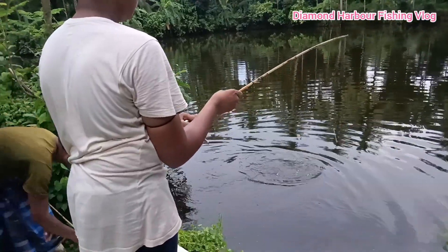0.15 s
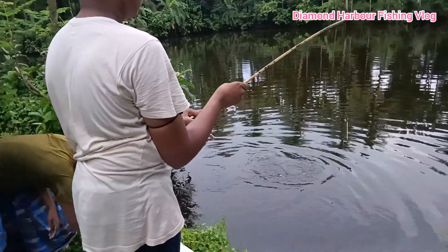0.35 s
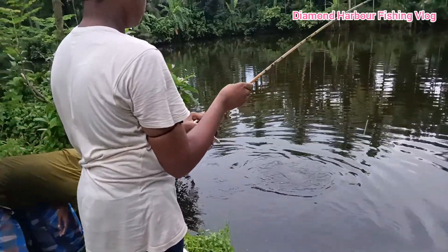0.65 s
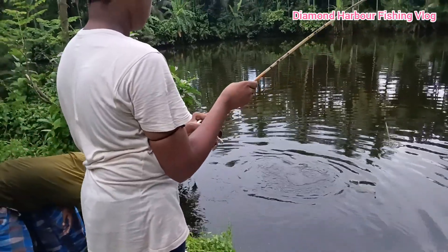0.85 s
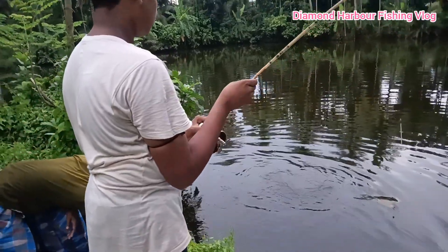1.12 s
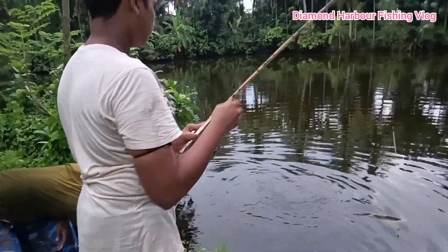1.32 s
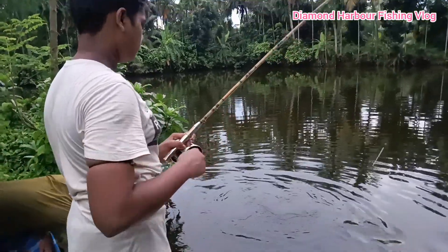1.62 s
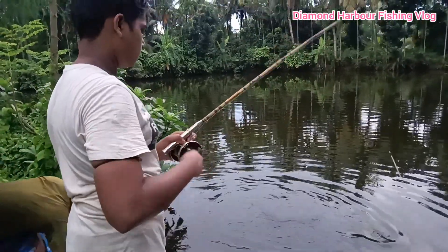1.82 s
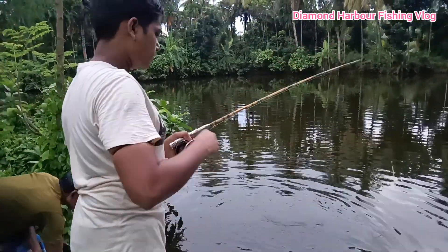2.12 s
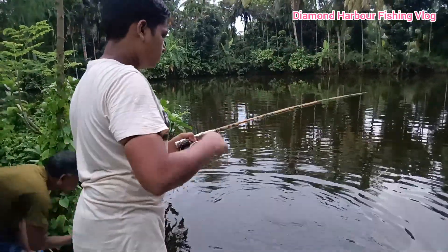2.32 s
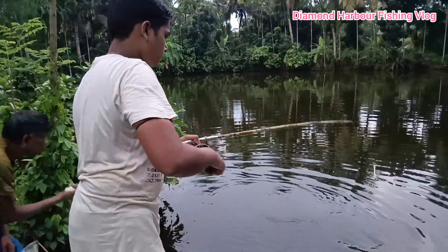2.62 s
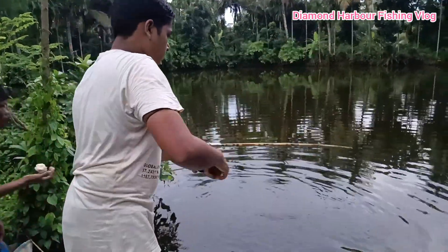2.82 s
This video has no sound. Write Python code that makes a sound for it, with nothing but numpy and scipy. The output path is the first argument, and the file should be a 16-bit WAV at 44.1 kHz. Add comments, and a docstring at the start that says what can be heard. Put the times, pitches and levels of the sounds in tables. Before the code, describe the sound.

A fishing reel, close and bright, dominates the second half. From 0 to 1.5 seconds there is only quiet pondside air, faint wavering bird whistles, soft rustling, tiny twig snaps and thin insects. At 1.5 seconds one metallic tick, two more near 1.62, then from 1.7 to the end a fast ratchet buzz of ringing clicks, surging and slackening several times a second, its tone shifting between fuller and thinner.

```python
"""A fishing reel ticks three times close by, then buzzes unevenly, while birds whistle far off by a pond.
The reel is a train of short ringing clicks, one per ratchet tooth, spaced by the changing spool speed.
Birds are wavering sine tones smeared by echoes; rustle and chatter are puffs of narrow noise.
Underneath lie shaped noise for air, insects, leaves and low thudding, plus faint blips and twig snaps."""
import sys
import numpy as np
from scipy import signal
from scipy.fft import rfft, irfft
from scipy.io import wavfile
from scipy.ndimage import uniform_filter1d

SR = 44100
rng = np.random.default_rng(int(sys.argv[2]) if len(sys.argv) > 2 else 0)


def decibels_to_gain(level_db):
    """Convert a level in decibels to a linear amplitude gain (20 dB per decade)."""
    exponent = np.asarray(level_db, float) / 20
    return 10 ** exponent


def int16_out(signal):
    """Quantize to a 16-bit WAV file."""
    q = np.round(np.clip(np.atleast_2d(signal).T, -1, 1) * 32767)
    wavfile.write(sys.argv[1], SR, q.astype(np.int16))


N = 130095  # length in samples
TIME_S = np.arange(N) / SR
FAR_TOP_HZ = 7500  # distance dulls sounds above this

# lone ratchet ticks as the handle takes up: (time [s], level [dB])
TICKS = [(1.52, -17.5), (1.6131, -16), (1.635, -14.5)]


def column(table, k, t):
    """Read column k of a curve at times t, with straight lines between its points."""
    table = np.array(table, float)
    return np.interp(t, table[:, 0], table[:, k])


def level(x, db):
    """Scale a sound to an rms level in dB."""
    return x * decibels_to_gain(db) / np.sqrt(np.mean(x ** 2))


def walk(rate_hz):
    """Random wandering with an rms of 1: noise smoothed twice, faster for a higher rate."""
    k = max(int(SR / rate_hz), 2)
    smooth = uniform_filter1d(rng.standard_normal(N), size=k)
    return level(uniform_filter1d(smooth, size=k), 0)


def band(x, hz, width_hz):
    """Keep a narrow band of sound by applying the same resonance twice."""
    b, a = signal.iirpeak(hz, hz / width_hz, SR)
    once = signal.lfilter(b, a, x)
    return signal.lfilter(b, a, once)


def dull(x):
    """Take off the treble that distance swallows, with a low-pass filter."""
    return signal.sosfilt(signal.butter(4, FAR_TOP_HZ, fs=SR, output="sos"), x)


def echoes(x, t60, start_ms):
    """Dense echoes of unit energy: noise that fades by 60 dB in t60 seconds."""
    t = np.arange(SR) / SR
    fade_in = np.clip(t * 1000 / start_ms - .5, 0, 1)
    h = rng.standard_normal(SR) * 1000. ** (-t / t60) * fade_in
    return signal.fftconvolve(x, h / np.sqrt(np.sum(h ** 2)))[:N]


def clicks(times, db, rings, detune, scatter_db, drift_db):
    """Each click swells and dies within a few ms; its rings line up at their crests, varying in pitch and level."""
    # how far each click's ringing is stretched: (time [s], stretch [factor])
    ring_stretch = [(1.7, 1.05), (1.95, 1.1), (2.2, 1.3), (2.95, 1.4)]
    out, n = np.zeros(N + 600), np.arange(512)
    first = np.ceil(times * SR).astype(int)
    places = first[:, None] + n
    ms = (places - times[:, None] * SR) * 1000 / SR  # time since each click began
    stretch = column(ring_stretch, 1, times)[:, None]
    for hz, ring_db, crest_ms in rings:
        scatter, off_pitch, drift = rng.standard_normal((3, len(times)))
        drift = uniform_filter1d(drift, size=16) * 4  # wanders slowly from click to click
        gain = decibels_to_gain(db + ring_db + scatter_db * scatter + drift_db * drift)[:, None]
        pitch = hz * (1 + detune * off_pitch[:, None])
        u = ms / (crest_ms * stretch)  # 1 at the crest
        swell = (u * np.exp(1 - u)) ** 5
        from_crest_ms = ms * (1 - 1 / np.maximum(u, 1e-6))
        wave = gain * swell * np.cos(2 * np.pi * pitch * from_crest_ms / 1000)
        out += np.bincount(places.ravel(), wave.ravel(), N + 600)[:N + 600]
    return out[:N]


def reel():
    """The pawl drops once per ratchet tooth and bounces; five groups of rings follow their own levels."""
    # spool speed: (time [s], ratchet clicks [per s])
    spool = [(1.7074, 152), (1.74, 180), (1.788, 270), (1.838, 146), (1.875, 265), (1.9, 290), (1.945, 182),
             (1.965, 178), (2.0, 250), (2.035, 320), (2.075, 232), (2.11, 268), (2.15, 290), (2.2, 248),
             (2.215, 262), (2.243, 375), (2.272, 250), (2.295, 232), (2.35, 300), (2.4, 260), (2.447, 345),
             (2.505, 205), (2.565, 345), (2.6, 262), (2.64, 350), (2.66, 380), (2.678, 220), (2.702, 205),
             (2.765, 335), (2.81, 262), (2.85, 320), (2.885, 225), (2.95, 330)]
    # average buzz levels, before the random changes: (time [s], main rings [dB],
    # then against the main rings: upper rings [dB], treble [dB], top [dB], low knock [dB])
    buzz = [(1.708, -12.5, -25, -21.5, -32, -31), (1.718, -16, -16, -19, -28, -20.5),
            (1.77, -17, -12.5, -11, -24, -15), (1.808, -11.5, -17.5, -13.5, -27, -22.5),
            (1.832, -18.5, -19, -9.5, -20, -25), (1.884, -15, -13, -10, -24, -24.5),
            (1.928, -20, -5, -6.5, -24, -18), (1.984, -14.5, -17, -12.5, -26, -30.5),
            (1.994, -22, -7, -3.5, -18, -22), (2.056, -17.5, -13, -9, -21.5, -23.5),
            (2.126, -17.5, -2, -8, -23, -20.5), (2.164, -21.5, -4.5, -4, -24, -20),
            (2.174, -13, -14, -13, -28, -30), (2.222, -20, -5.5, -7, -20, -18),
            (2.246, -12, -11, -10.5, -25, -28.5), (2.27, -19, -9.5, -11.5, -23, -18),
            (2.32, -19.5, -0.5, -8, -25, -25.5), (2.364, -22.5, -1.5, -8.5, -32, -19.5),
            (2.392, -15, -13, -14, -32, -20), (2.416, -21, -5.5, -9.5, -26, -15.5),
            (2.448, -14.5, -6, -17.5, -29, -31), (2.462, -20.5, -8, -14.5, -31, -16.5),
            (2.524, -21.5, 2, -10, -25, -20.5), (2.554, -14.5, -7.5, -19, -33, -28),
            (2.616, -26, -1, -9.5, -21, -17.5), (2.642, -15.5, -7, -18.5, -28.5, -24),
            (2.676, -19.5, -12.5, -18, -30, -16.5), (2.69, -25, 0.5, -9.5, -21, -12.5),
            (2.752, -17.5, -1.5, -15.5, -29, -25), (2.794, -24, -3.5, -11, -23, -21),
            (2.866, -20.5, -10, -19.5, -26, -23), (2.885, -27, -5, -16.5, -26, -11.5),
            (2.95, -21, -2.5, -16, -21, -20)]
    # what the reel rings with, one list per group in the order of buzz:
    # (pitch [Hz], level [dB], time to the crest before stretching [ms])
    ring_groups = [
        [(2098, -2, 2.2), (2255, -1, 2.2), (2394, -5, 2.2)],
        [(2820, -7, 1.495), (3267, -5, 1.5), (3606, 0, 1.6)],
        [(4550, 4.5, 0.5), (5130, -0.5, 0.6), (6130, -6, 1), (6440, -3, 0.97), (7430, -3, 0.96),
         (8290, -7, 0.56), (9370, -19.5, 0.91)],
        [(11300, -2.5, 0.36), (13000, -22, 1), (12660, -7, 1), (15100, 0.5, 0.65)],
        [(965, -12.5, 2.21), (1270, 0, 2.03), (1645, 6.5, 2.7)],
    ]
    # the rest hold one value per group; click peak over the average level [dB]
    buzz_peak_db = [0, 5, 1, 4.5, 0]
    # each group's share of a lone tick [dB]
    tick_layers_db = [-9, -16.5, -21.5, -25.5, -40]
    # the pawl's second, weaker bounce, against the first drop [dB]
    rattle_db = [-22, -13, -3, -4, -22]
    # click-to-click spread of level [dB]
    ring_scatter_db = [1.2, 1.5, 2.5, 3, 1]
    # click-to-click spread of pitch [share of the pitch]
    ring_detune = [.005, .01, .02, .04, .006]
    # slow wander of each ring's strength [dB]
    ring_drift_db = [.8, 1.5, 3, 2.5, 3.5]
    # what bodies and bank throw back of each click [dB]
    tail_db = [-15, -10, -2, -3, -12]
    rattle_ms, click_jitter_ms, click_scatter_db = 2.5, .06, 1.0
    tail_t60_s, tail_start_ms, low_cut_hz = 0.059, 1.3, 780

    t = np.arange(int(spool[0][0] * SR), N) / SR
    teeth = np.cumsum(column(spool, 1, t)) / SR  # teeth passed so far
    drops = np.interp(np.arange(int(teeth[-1])), teeth, t)
    jitter, scatter = rng.standard_normal((2, len(drops)))
    drops = np.clip(drops + click_jitter_ms / 1000 * jitter, 0, t[-1])
    ticks = np.array(TICKS)
    times = np.r_[ticks[:, 0], drops]
    delay_s = rattle_ms / 1000 * np.exp(.3 * rng.standard_normal(len(times)))
    bounces = np.clip(times + delay_s, 0, t[-1])
    # sparser clicks are louder, so that the average level follows the table
    shared_db = column(buzz, 1, drops) + click_scatter_db * scatter
    shared_db = shared_db + 10 * np.log10(250 / column(spool, 1, drops))
    out = 0
    for k, rings in enumerate(ring_groups):
        buzz_db = shared_db + buzz_peak_db[k]
        if k:
            buzz_db = buzz_db + column(buzz, k + 1, drops)
        db = np.r_[ticks[:, 1] + tick_layers_db[k], buzz_db]
        direct = clicks(np.r_[times, bounces], np.r_[db, db + rattle_db[k]], rings,
                        ring_detune[k], ring_scatter_db[k], ring_drift_db[k])
        out = out + direct + decibels_to_gain(tail_db[k]) * echoes(direct, tail_t60_s, tail_start_ms)
    return signal.sosfilt(signal.butter(6, low_cut_hz, "high", fs=SR, output="sos"), out)


def shiver():
    """The frame shivers after each lone tick: bands of noise that die away."""
    # (centre [Hz], width [Hz], level against the tick [dB])
    shiver_bands = [(2096, 360, -17), (3500, 510, -22), (6060, 2400, -28.5)]
    t60_s = 0.11
    fade = 0
    for s, db in TICKS:
        started = TIME_S > s + .004
        fade = fade + decibels_to_gain(db) * started * 1000. ** (-np.abs(TIME_S - s) / t60_s)
    return fade * sum(level(band(rng.standard_normal(N), hz, w), db) for hz, w, db in shiver_bands)


def birds():
    """Whistles are sine tones gliding between two pitches; they waver, flutter and are smeared by the wood."""
    # notes: (start [s], length [s], first pitch [Hz], last pitch [Hz], level before flutter [dB],
    # pitch waver [Hz])
    notes = [(0., 0.11, 1888, 1867, -50, 11), (0., 0.11, 1314, 1330, -54.5, 9.8),
             (.185, 0.056, 1308, 1270, -56.5, 15), (0.38, 0.22, 1310, 1300, -62, 18),
             (.015, 0.031, 2305, 2450, -42, 19), (.075, 0.11, 2431, 2380, -45, 9.2),
             (0.145, 0.039, 1990, 2010, -48, 12), (0.159, 0.1, 2335, 2150, -46, 40),
             (.2, 0.096, 2248, 2344, -54, 14), (0.25, 0.06, 2357, 2400, -48, 16),
             (.36, 0.05, 2393, 2452, -46, 8.3), (.415, 0.07, 2501, 2505, -45, 13),
             (0.499, 0.054, 2450, 1486, -45.5, 100), (0.545, 0.054, 1457, 2170, -49.5, 98),
             (.49, 0.139, 2540, 2510, -46, 9.3), (.59, 0.071, 2292, 2067, -44.5, 75),
             (.64, 0.087, 2219, 2198, -42.5, 11), (0.733, 0.055, 2124, 2084, -47, 13),
             (.8, 0.088, 2183, 2184, -51, 33), (.92, 0.092, 2230, 2264, -54.5, 28),
             (.66, 0.14, 2383, 2475, -53.5, 15), (0.669, 0.058, 600, 599, -55, 7.8),
             (1.096, 0.135, 1340, 1420, -55, 16), (.95, 0.063, 1235, 1305, -61, 12),
             (.81, 0.099, 629, 505, -65, 6.8), (1.65, 0.57, 761, 787.3, -55.5, 33)]
    flutter_hz, flutter_db, waver_rate_hz = 70, 3.0, 500
    wood_t60_s, wood_db, wood_start_ms = .55, -2.5, 14.0
    out = np.zeros(N)
    flutter = decibels_to_gain(flutter_db * walk(flutter_hz))
    wobble = walk(waver_rate_hz)
    for start, length, from_hz, to_hz, db, waver_hz in notes:
        u = np.linspace(0, 1, int(length * SR))  # progress through the note
        i = int(start * SR)
        hz = from_hz + (to_hz - from_hz) * u + waver_hz * wobble[i:i + len(u)]
        swell = np.minimum(1, 9 * np.minimum(u, 1 - u))
        out[i:i + len(u)] += decibels_to_gain(db) * swell * np.sin(2 * np.pi * np.cumsum(hz) / SR)
    out = out * flutter
    return out + decibels_to_gain(wood_db) * echoes(out, wood_t60_s, wood_start_ms)


def puffs():
    """Rustle and blurred far chatter: narrow noise that swells and sinks in soft humps."""
    # (start [s], length [s], centre [Hz], width [Hz], level before the hump [dB])
    swells = [(0.506, 0.096, 4370, 500, -71), (.6, 0.2, 3460, 400, -66), (0.665, 0.094, 4760, 900, -62),
              (0.815, 0.13, 3500, 600, -62.5), (0.848, 0.21, 2440, 600, -56.5),
              (1.41, 0.051, 4900, 500, -66), (1.641, 0.071, 5190, 716, -49), (1.25, 0.077, 3000, 600, -67),
              (0., 0.77, 2180, 426, -55), (0.48, 0.55, 1830, 674, -56.5), (0.682, 0.89, 2100, 525, -63.5)]
    out = 0
    for start, length, hz, width, db in swells:
        hump = np.sin(np.pi * np.clip((TIME_S - start) / length, 0, 1)) * decibels_to_gain(0.72 * walk(66))
        out = out + hump * level(band(rng.standard_normal(N), hz, width), db)
    return out


def snaps():
    """Small twig snaps: single impulses sent through a broad resonance."""
    # (time [s], impulse level before the resonance and a gain of 3 [dB])
    twigs = [(.44, -30), (0.562, -30), (1.275, -37)]
    out = np.zeros(N)
    for s, db in twigs:
        out[int(s * SR)] = decibels_to_gain(db)
    return 3 * band(out, 2300, 2500)


def leaves():
    """Rustling leaves: a broad band of uneven noise that follows a level curve."""
    # (time [s], level [dB])
    rustle = [(0, -62.5), (.33, -71.5), (.55, -61), (1.0, -67), (1.1, -73), (1.5, -69)]
    noise = rng.standard_normal(N) * decibels_to_gain(2.0 * walk(130))
    noise = level(band(noise, 2860, 3000), 0)
    return dull(noise) * decibels_to_gain(column(rustle, 1, TIME_S))


def insects():
    """Insects: narrow bands of noise whose strength wavers quickly."""
    # (centre [Hz], width [Hz], level [dB])
    singers = [(6740, 690, -73), (7610, 160, -76.5), (9260, 57, -78), (9340, 110, -82)]
    out = 0
    for hz, width, db in singers:
        out = out + level(band(rng.standard_normal(N), hz, width) * decibels_to_gain(2.5 * walk(17)), db)
    return out


def blips():
    """Faint low sine blips come and go at random times and pitches."""
    low_hz, high_hz, length_s, softest_db = 350, 1400, .05, -73
    out = np.zeros(N)
    for when, pitch, size in rng.random((70, 3)):
        hz = low_hz * (high_hz / low_hz) ** pitch
        u = np.clip((TIME_S - when * TIME_S[-1]) / length_s, 0, 1)
        tone = np.sin(2 * np.pi * hz * length_s * u)
        out = out + decibels_to_gain(softest_db + 8 * size) * np.sin(np.pi * u) * tone
    return out


def rumble():
    """Far, lumpy thudding: low noise whose strength wavers."""
    noise = rng.standard_normal(N) * decibels_to_gain(2.5 * walk(14))
    return level(band(noise, 90, 89.4), -74.5)


def air():
    """Background air: noise shaped across pitch, with a slowly changing level."""
    # balance across pitch: (pitch [Hz], relative level per Hz [dB])
    tone = np.array([(18, -55), (30, -21), (88, -1), (287, -10.5), (437, -8.5), (649, -7), (740, -7.5),
                     (1190, -4.5), (1430, -5), (1590, -7), (2830, -11.5), (4190, -65), (5040, -28),
                     (5900, -65), (8980, -9.5), (11100, -39), (16000, -28)])
    # gain over time: (time [s], level [dB])
    air_swell = [(0, 10), (.5, 9.5), (1., 10), (1.3, 2.5), (1.6, 10), (2.95, 12)]
    hz = np.maximum(np.arange(N // 2 + 1) * SR / N, 1)
    shape = decibels_to_gain(np.interp(np.log(hz), np.log(tone[:, 0]), tone[:, 1]))
    noise = level(irfft(rfft(rng.standard_normal(N)) * shape, N), -67)  # before the swell
    return noise * decibels_to_gain(column(air_swell, 1, TIME_S) + 0.6 * walk(0.9))


def pondside():
    """The quiet surroundings: small sounds over a floor of insects and air."""
    return snaps() + leaves() + insects() + blips() + rumble() + air()


def scene():
    """One microphone on both channels hears the near reel and the dulled far sounds."""
    far = dull(birds() + puffs())
    return np.tile(reel() + shiver() + far + pondside(), (2, 1))


def low_pass(x):
    """Removes everything above the highest recorded frequency."""
    return signal.sosfilt(signal.butter(12, 16990, fs=SR, output="sos"), x)


def record(dry):
    """The phone cuts the top treble with a steep low-pass filter."""
    top_hz = 15900
    mix = signal.sosfilt(signal.ellip(10, .3, 70, top_hz, fs=SR, output="sos"), dry)
    return low_pass(mix)


dry = scene()
out = record(dry)
int16_out(out)
```